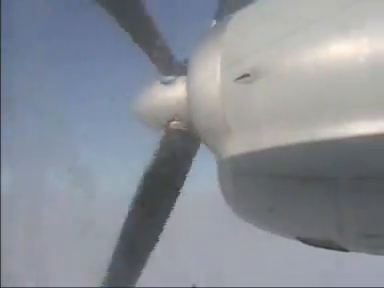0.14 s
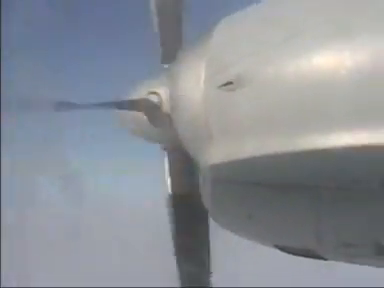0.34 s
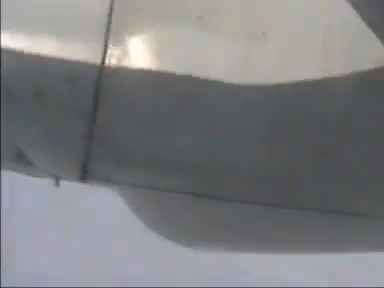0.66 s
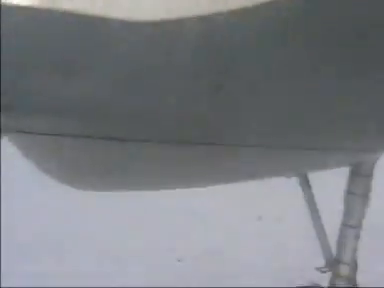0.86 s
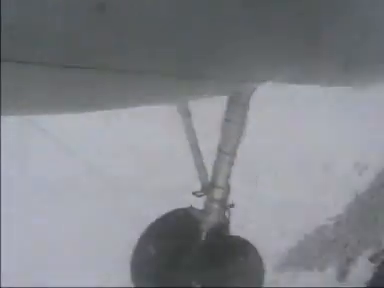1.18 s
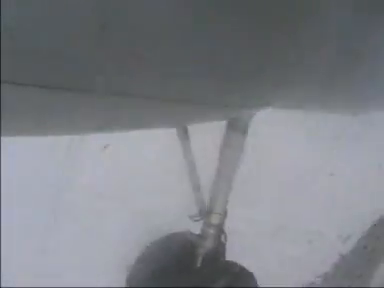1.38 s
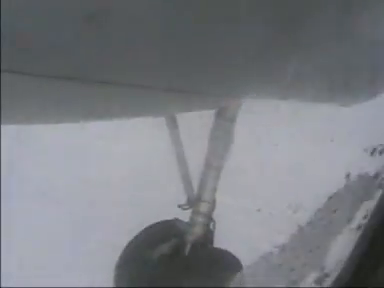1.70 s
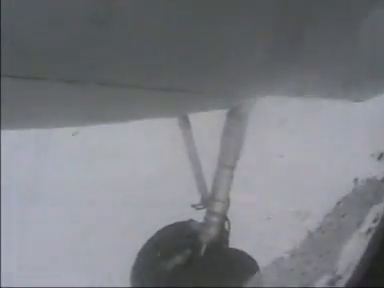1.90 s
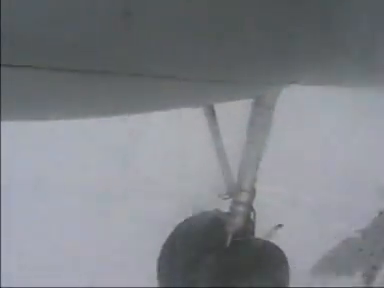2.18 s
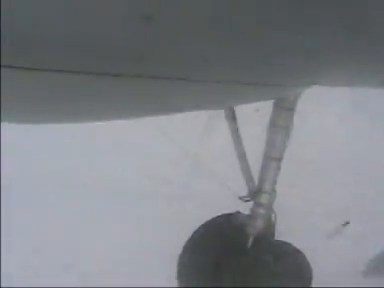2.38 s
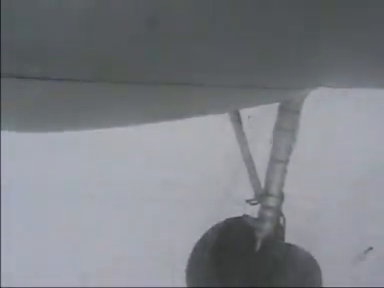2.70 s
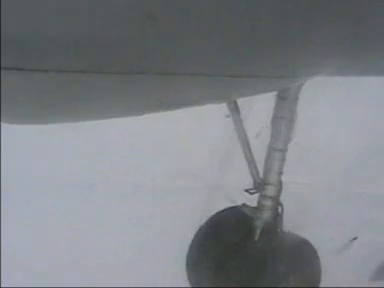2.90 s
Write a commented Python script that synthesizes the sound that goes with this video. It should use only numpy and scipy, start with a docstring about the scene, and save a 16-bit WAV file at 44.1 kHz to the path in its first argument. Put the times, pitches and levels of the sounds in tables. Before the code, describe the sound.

The low, even hum of an airliner's propeller is heard from a window seat beside the engine, with rumbling, hissing airflow and a faint high whine. Two light ticks come nearby, then a short rub, as the drone continues.

```python
"""Inside a propeller airliner in flight, at a window beside the engine.
From the start the blades beat a steady low hum into the cabin over the rush of air along the fuselage
and a faint turbine whine; the microphone flattens the crest of each blade pulse.
Two tiny ticks sound close by at 0.1 and 0.4 s, then a brief rub just after 1 s.
Hum, airflow and whine carry on to the end."""
import sys
import numpy as np
from scipy import signal
from scipy.io import wavfile

SR = 44100
rng = np.random.default_rng(int(sys.argv[2]) if len(sys.argv) > 2 else 0)


def generate_wav(signal):
    """Clip the signal to [-1, 1] and save it as 16-bit WAV at the path in sys.argv[1]."""
    frames = np.transpose(np.atleast_2d(signal))
    scaled = np.clip(frames, -1, 1) * 32767
    pcm = np.round(scaled).astype(np.int16)
    wavfile.write(sys.argv[1], SR, pcm)


N = 134505
TIME_S = np.arange(N) / SR


def from_db(db):
    """Decibels to gain."""
    return 10 ** (np.asarray(db) / 20)


def unit_rms(x):
    """Scale to unit power."""
    return x / np.sqrt(np.mean(x ** 2) + 1e-20)


def swing_db(curve):
    """Level curve about its own mean."""
    db = np.interp(TIME_S, *np.transpose(curve))
    return db - db.mean()


def drift(rate_hz):
    """Smooth random signal, unit RMS, changing about rate_hz times a second."""
    hop, warmup = 40, 2000
    pole = np.exp(-2 * np.pi * hop * rate_hz / SR)
    white = rng.standard_normal(N // hop + warmup + 2)
    slow = signal.lfilter([1], [1, -2 * pole, pole * pole], white)[warmup:]
    return np.interp(np.arange(N) / hop, np.arange(len(slow)), unit_rms(slow))


def band_noise(spectrum, flicker_db, flicker_hz):
    """Third-octave noise bands, each flickering separately; unit RMS overall."""
    hz, db = np.transpose(spectrum)
    edges_hz = 22 * 2 ** (np.arange(30) / 3)
    white = rng.standard_normal((2, N + SR // 4))
    out = 0
    for k, (low, high) in enumerate(zip(edges_hz, edges_hz[1:])):
        centre_hz = np.sqrt(low * high)
        flicker = drift(flicker_hz)
        if hz[0] / 2 < centre_hz < hz[-1] * 2:
            bandpass = signal.butter(2, [low, high], "band", fs=SR, output="sos")
            band = signal.sosfilt(bandpass, white[k % 2])[-N:]
            band_db = np.interp(np.log(centre_hz), np.log(hz), db)
            out = out + band * from_db(band_db + flicker_db * flicker)
    return unit_rms(out)


def high_pass(x, hz):
    """First-order bass cut."""
    return signal.sosfilt(signal.butter(1, hz, "high", fs=SR, output="sos"), x)


# Blade harmonics, fundamental first: level/dB, flutter/fraction of amplitude
BLADE_HARMONICS = [(-46, 0.017), (-49, 0.026), (-54.5, 0.28), (-67.5, 0.087), (-72, 0.43), (-70, 0.3)]
# Swell of harmonics 1-3, before centring and scaling: t/s, level 1/dB, level 2/dB, level 3/dB
BLADE_SWELL = [(0.03, -51, -51.5, -55), (0.16, -47, -50.5, -44), (0.28, -50.5, -49.5, -57),
               (0.36, -47.5, -52, -54.5), (0.5, -50, -50, -56.5), (0.65, -48.5, -52.5, -52),
               (0.82, -49, -50.5, -56), (0.9, -46, -48.5, -60), (0.94, -47, -51, -54),
               (1.08, -46, -48.5, -57), (1.23, -48, -51.5, -58), (1.39, -49.5, -50, -56),
               (1.42, -48.5, -52.5, -66), (1.46, -46.5, -48.5, -54.5), (1.7, -48, -49, -58),
               (1.86, -48, -49.5, -58.5), (2.0, -47, -51.5, -54), (2.05, -45.5, -48, -63),
               (2.08, -47.5, -49.5, -54), (2.26, -48.5, -49.5, -52.5), (2.67, -47, -51.5, -54),
               (2.85, -47, -47.5, -55.5), (2.93, -49, -53, -54.5)]

def propeller(blade_hz=86.4, wander_hz=0.075, flutter_hz=7.2, pulse_duty=0.27, swell_scale=0.91):
    """One pressure pulse per passing blade; turbulence shakes the upper harmonics most."""
    phase = 2 * np.pi * np.cumsum(blade_hz + wander_hz * drift(0.5)) / SR
    out = 0
    for k, (db, flutter) in enumerate(BLADE_HARMONICS, 1):
        shake = 1 + flutter * (drift(flutter_hz) + 1j * drift(flutter_hz))
        swell_db = swell_scale * swing_db(np.array(BLADE_SWELL)[:, [0, k]]) if k <= 3 else 0
        polarity = np.sign(np.sinc(k * pulse_duty))  # as in a flat-topped pulse
        amplitude = np.sqrt(2) * from_db(db + swell_db)
        out = out + polarity * amplitude * np.real(shake * np.exp(1j * k * phase))
    return out


# Rumble spectrum: f/Hz, relative density/dB
RUMBLE_SPECTRUM = [(25, -21), (45, -18), (65, -9.5), (105, 1), (140, -1.5), (200, 3), (280, 0.5), (340, -3),
                   (450, -9.5), (600, -22)]
# Rumble envelope: t/s, relative level/dB
RUMBLE_ENVELOPE = [(0, -2.5), (.15, -2), (.3, 2), (.5, -3), (.66, -0.5), (.88, -4.5), (1.0, 2), (1.2, 0.2),
                   (1.8, -1), (2.4, -1.5), (3.05, 1)]

def airflow_rumble(level_db=-54):
    """Deepest, lumpy part of the airflow, heard through the cabin wall."""
    gain = from_db(level_db + swing_db(RUMBLE_ENVELOPE))
    return gain * band_noise(RUMBLE_SPECTRUM, flicker_db=1, flicker_hz=4.5)


# Low and hollow roar spectra: f/Hz, relative density/dB
LOW_SPECTRUM = [(220, -11.5), (310, -1), (390, -1), (480, -1.5), (620, -12), (850, -30.5)]
HOLLOW_SPECTRUM = [(350, -19), (490, -7.5), (620, 0), (780, -7), (950, -18.5), (1200, -27)]
# Low and hollow roar envelopes: t/s, relative level/dB
LOW_ENVELOPE = [(0, 1), (.08, 1.5), (.15, 5), (.21, 2.5), (.28, -2), (.35, 2.5), (.46, 2.5), (.58, -1.5),
                (.65, 5), (.76, 2.3), (.88, -1), (.98, -1), (1.12, 1.5), (1.31, -2.5), (1.5, -2), (1.7, -2),
                (2.25, -2.5), (2.38, 3.7), (2.46, -1), (2.51, -2.5), (2.66, -3), (2.77, 0), (3.05, -1.5)]
HOLLOW_ENVELOPE = [(0, -2.5), (.14, 4.5), (.19, 3.5), (.26, 5), (.39, 2), (.49, 4.5), (.58, -3.5),
                   (.8, 0.5), (.97, -1.8), (1.3, -1.5), (1.42, -1.5), (1.65, 2), (1.73, -1), (1.87, -4.5),
                   (1.97, 2.5), (2.2, -0.5), (2.38, 0.7), (2.68, 0), (2.84, -0.5), (3.05, -3)]

def airflow_roar(low_db=-56, hollow_db=-59.5):
    """Roar of the airflow: a low and a higher, hollow register surge separately."""
    low = band_noise(LOW_SPECTRUM, flicker_db=0.4, flicker_hz=4)
    hollow = band_noise(HOLLOW_SPECTRUM, flicker_db=0.5, flicker_hz=8.2)
    low_gain = from_db(low_db + swing_db(LOW_ENVELOPE))
    hollow_gain = from_db(hollow_db + swing_db(HOLLOW_ENVELOPE))
    return low_gain * low + hollow_gain * hollow


# Rush spectrum: f/Hz, relative density/dB
RUSH_SPECTRUM = [(400, 0), (700, -0.5), (950, 5), (1150, 3), (1400, -4), (1600, -5), (2000, -16.5),
                 (2600, -23), (4000, -51)]
# Rush envelope: t/s, relative level/dB
RUSH_ENVELOPE = [(0, 1), (.17, -0.5), (.4, 0), (.5, -4.5), (.59, -0.5), (.7, -2), (.88, 0.5), (1.05, 1),
                 (1.35, -1), (1.54, 2), (1.67, -1), (1.75, -3.3), (1.97, -0.5), (2.14, -1), (2.23, -3.5),
                 (2.4, 1.3), (2.5, 0.5), (2.7, 1), (2.85, 1.2), (3.05, -0.5)]

def airflow_rush(level_db=-62.5, tremble_db=1.22):
    """Midrange of the airflow, trembling slightly."""
    gain = from_db(level_db + swing_db(RUSH_ENVELOPE) + tremble_db * drift(8.8))
    return gain * band_noise(RUSH_SPECTRUM, flicker_db=0.1, flicker_hz=7.1)


# Hiss spectrum: f/Hz, relative density/dB
HISS_SPECTRUM = [(1200, 7), (2200, 3.5), (3000, 2), (4100, 3), (5200, -2.5), (6000, -3), (7800, -5),
                 (9000, -12), (11300, -15), (12500, -29), (14000, -19)]
# Hiss envelope: t/s, relative level/dB
HISS_ENVELOPE = [(0, -11), (.15, 2), (.25, -4.5), (.45, 0), (.49, -7), (.57, -9), (.66, 1.5), (.85, -0.5),
                 (1.0, 2.5), (1.3, 0), (1.5, 1.8), (1.67, 0.5), (1.74, -1), (1.85, 0.5), (2.2, 0.5),
                 (2.42, 2.5), (2.49, -2), (2.7, -0.5), (3.05, 0)]

def airflow_hiss(level_db=-70, tremble_db=1.36):
    """Bright hiss of the air along the fuselage."""
    gain = from_db(level_db + swing_db(HISS_ENVELOPE) + tremble_db * drift(24))
    return gain * band_noise(HISS_SPECTRUM, flicker_db=0.5, flicker_hz=2.6)


# Rub and brush spectra: f/Hz, relative density/dB
RUB_SPECTRUM = [(1000, -1), (2000, -3), (2800, 0), (3500, -1), (4500, 5), (6000, -9), (8500, -11),
                (10500, -28), (15000, -45)]
BRUSH_SPECTRUM = [(1500, -2), (5000, 0.5), (6200, -6), (8200, -2), (11000, -20), (14000, -30)]

def rub(peak_s=1.054, width_s=0.028, rub_db=-63.5, brush_db=-70, rise_s=0.1, fall_s=0.06):
    """A soft, grainy rub swells and dies inside a fainter, longer brush."""
    offset_s = TIME_S - peak_s
    rub_gain = np.exp(-(offset_s / width_s) ** 2) * from_db(rub_db + 0.79 * drift(90))
    grain = band_noise(RUB_SPECTRUM, flicker_db=2, flicker_hz=30)
    slope_s = np.where(offset_s < 0, rise_s, fall_s)
    brush_gain = np.exp(-np.abs(offset_s) / slope_s) * from_db(brush_db)
    brush = band_noise(BRUSH_SPECTRUM, flicker_db=-1.5, flicker_hz=39)
    return rub_gain * grain + brush_gain * brush


# Tick onsets: t/s, level/dB
TICK_ONSETS = [(.112, -64), (0.388, -67)]
# Tick spectrum: f/Hz, relative density/dB
TICK_SPECTRUM = [(1500, -27), (4000, 6), (10000, 0), (12500, -9), (15000, -28)]

def ticks(decay_s=0.0063):
    """Two light ticks near the microphone: bright noise, instant attack, fast decay."""
    gain = 0
    for onset_s, db in TICK_ONSETS:
        age_s = TIME_S - onset_s
        gain = gain + from_db(db) * (age_s >= 0) * np.exp(-np.abs(age_s) / decay_s)
    return gain * band_noise(TICK_SPECTRUM, flicker_db=3, flicker_hz=30)


# Turbine whines: f/Hz, width/Hz, level/dB, peak t/s, fade either side/(dB/s)
TURBINE_WHINES = [(4545, 180, -77.5, 0.82, 2.5), (4990, 110, -78.5, 2.05, 5.5), (4720, 1100, -79.5, 2.1, 1),
                  (7540, 620, -84.5, 0.67, 1)]

def turbine(waver_db=1.9):
    """Turbine whine: narrow, unsteady whistles, each swelling and fading slowly."""
    out = 0
    for hz, width_hz, db, peak_s, fade_db_per_s in TURBINE_WHINES:
        blur = drift(width_hz / 2) + 1j * drift(width_hz / 2)
        gain = from_db(db - fade_db_per_s * np.abs(TIME_S - peak_s) + waver_db * drift(4))
        out = out + gain * np.real(blur * np.exp(2j * np.pi * hz * TIME_S))
    return out


def scene():
    """Sum at the window seat, mono."""
    cabin = propeller() + airflow_rumble() + airflow_roar() + airflow_rush() + airflow_hiss()
    return (cabin + turbine() + rub() + ticks())[None]


# Microphone self-noise spectrum: f/Hz, relative density/dB
MIC_NOISE_SPECTRUM = [(1500, 5), (3000, 3.5), (5000, 1), (6200, 0), (7800, -4), (9000, -6.5), (11300, -9.5),
                      (12500, -20), (14000, -28)]

def record(dry):
    """The microphone cuts bass, flattens crests, hisses and loses treble; camera electronics whistle."""
    low_cut_hz, dc_block_hz, treble_edge_hz, cutoff_hz = 56, 10, 12740, 17000
    crest_limit, knee = 0.013, 6.5
    noise_db, whistle_db, whistle_hz = -72, -101, 15625
    thinned = high_pass(dry, low_cut_hz)
    overdrive = np.maximum(thinned, 0) / crest_limit  # positive crests only
    flattened = thinned / (1 + overdrive ** knee) ** (1 / knee)
    self_noise = from_db(noise_db) * band_noise(MIC_NOISE_SPECTRUM, flicker_db=0.5, flicker_hz=12)
    noisy = high_pass(flattened, dc_block_hz) + self_noise
    dulled = signal.sosfilt(signal.butter(10, treble_edge_hz, fs=SR, output="sos"), noisy)
    whistle = np.sqrt(2) * from_db(whistle_db) * np.sin(2 * np.pi * whistle_hz * TIME_S)
    return signal.sosfilt(signal.cheby2(12, 60, cutoff_hz, fs=SR, output="sos"), dulled + whistle)


dry = scene()
out = record(dry)
generate_wav(out)
```